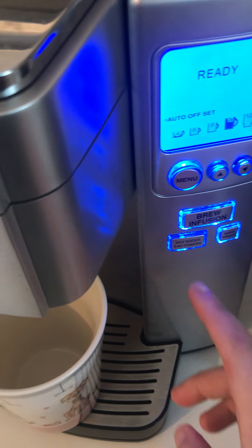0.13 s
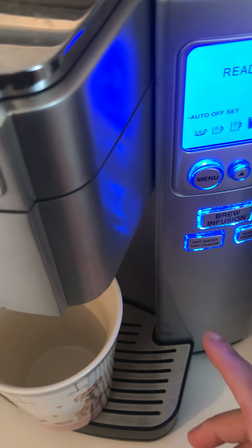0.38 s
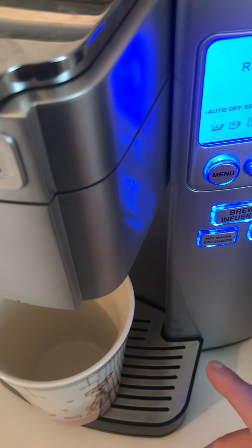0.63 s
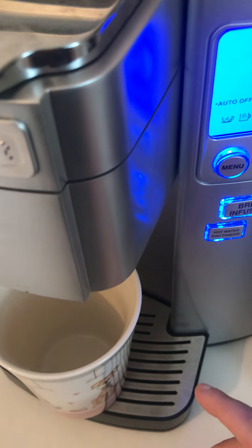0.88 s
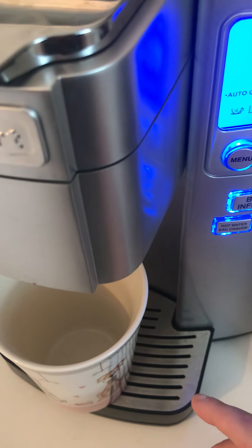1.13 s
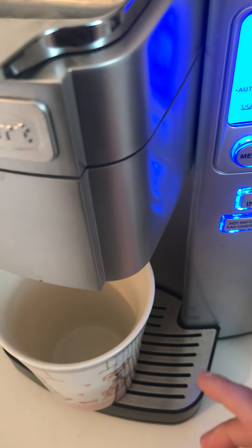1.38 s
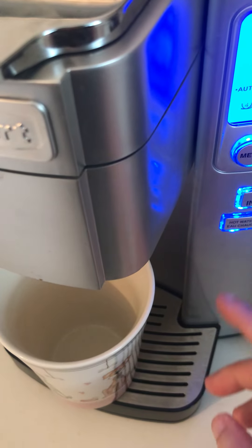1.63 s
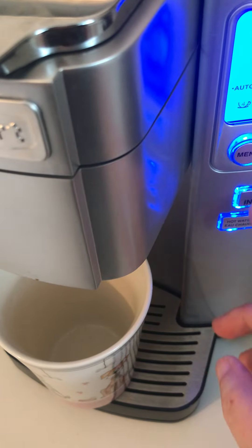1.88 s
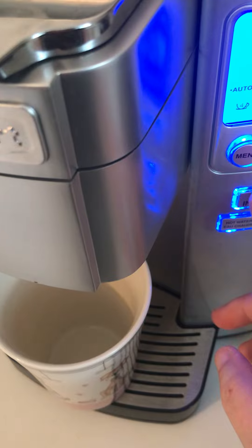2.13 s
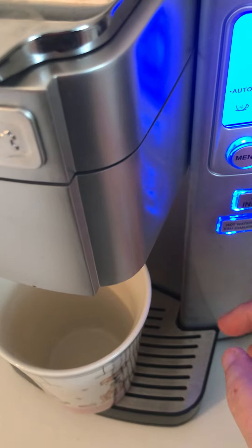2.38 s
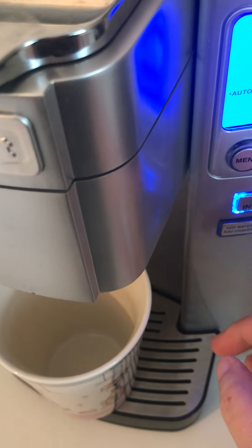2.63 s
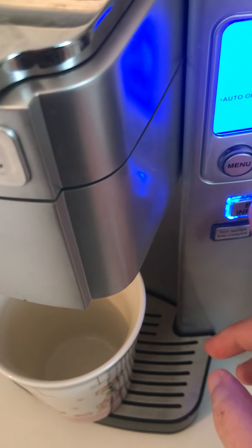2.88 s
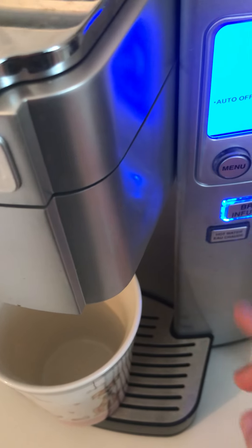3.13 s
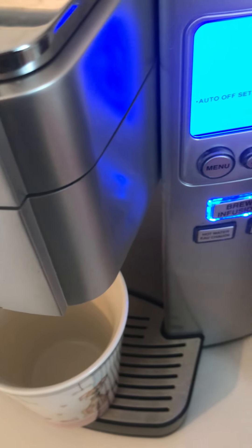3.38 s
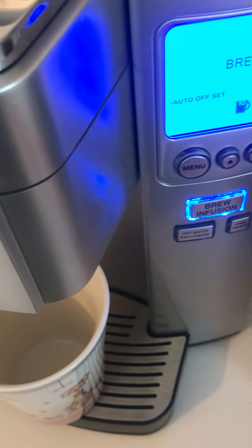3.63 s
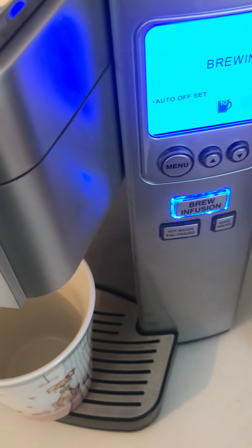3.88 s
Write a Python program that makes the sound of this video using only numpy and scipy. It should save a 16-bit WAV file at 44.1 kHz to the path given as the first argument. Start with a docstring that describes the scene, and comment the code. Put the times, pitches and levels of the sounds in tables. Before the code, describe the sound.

After over two seconds of quiet room tone and faint regular ticking, a switch snaps, and a coffee maker's vibrating pump buzzes low to the end with small water ticks, close phone microphone, little echo.

```python
"""Coffee machine starting its pump

A quiet kitchen, one phone microphone, the machine heard with only a little of the room around it. Its switch
clicks in and out as ringing plastic; then a mains-driven vibration pump starts: stroke harmonics hum, the piston
knocks on its stop and a valve snaps once a stroke, and shaped noise hisses as pressure builds. A low tone glides
up at the start and water ticks in the tubing. A fridge-like motor farther off drones just under mains pitch and
beats with the pump; a faint, high tick repeats steadily over the room tone.
"""
import sys
import numpy as np
from scipy import signal
from scipy.fft import rfft, irfft
from scipy.io import wavfile
from scipy.ndimage import uniform_filter1d, map_coordinates

SR = 44100
rng = np.random.default_rng(int(sys.argv[2]) if len(sys.argv) > 2 else 0)


def master_out(mix):
    """Clip the mix to full scale and print it as 16-bit PCM to the path in sys.argv[1]."""
    frames = np.transpose(np.atleast_2d(mix))
    ceiling = np.clip(frames, -1, 1)
    pcm = np.round(ceiling * 32767).astype(np.int16)
    wavfile.write(sys.argv[1], SR, pcm)


def natural_amplitude(level_db):
    """Convert a level in decibels to a linear amplitude factor, elementwise."""
    exponent = np.asarray(level_db, float) / 20
    return 10 ** exponent


N = 176400
T = np.arange(N) / SR

MAINS_HZ = 60
STROKE_S = 0.0118  # the piston lands this far into a mains cycle
TURN = 2 * np.pi * MAINS_HZ * (T - STROKE_S)  # phase of the stroke in radians
VALVE_LAG_S = 0.0052  # the valve snaps this long after the piston


def unit(x):
    """Scale to rms 1."""
    return x / np.sqrt(np.mean(x ** 2) + 1e-20)


def along(points, hz):
    """Read a curve of (Hz, value) points on a log frequency axis."""
    f, v = np.transpose(points)
    return np.interp(np.log(hz + 1), np.log(f + 1), v)


def wobble(rate):
    """A smooth random curve through rate knots a second."""
    return map_coordinates(rng.standard_normal(int(N * rate / SR) + 4), [T * rate])


def rush(spectrum, patchy_db, low_hz=0):
    """Coloured noise of rms 1, with time-frequency patches of random gain (patchy_db rms)."""
    z = signal.stft(rng.standard_normal(N + 512), nperseg=512)[2]
    field = uniform_filter1d(rng.standard_normal(z.shape), size=5, axis=0)
    field = uniform_filter1d(field, size=8, axis=1)
    patchy = signal.istft(z * natural_amplitude(patchy_db * unit(field)), nperseg=512)[1][:N]
    hz = np.fft.rfftfreq(N, 1 / SR)
    colour = natural_amplitude(along(spectrum, hz)) * (hz > low_hz)
    return unit(irfft(rfft(patchy) * colour, N))


def strike(hits, modes, crack_db, crack_s, scatter_db=3, spread=.012, attack_s=0.00022, count=1):
    """Each hit (s, dB, tilt) rings count decaying, detuned partials around every mode, with a crack of noise."""
    out, t = np.zeros(N + SR), np.arange(SR // 10) / SR
    hz, level, t60 = np.repeat(np.transpose(modes), count, axis=1)[:, :, None]
    place = np.tile(np.linspace(-1, 1, count + 2)[1:-1], len(modes))[:, None]
    for s, db, tilt in hits:
        level_draw, pitch_draw, phase = rng.standard_normal((3, len(hz), 1))
        detuned_hz = hz * (1 + spread * (place + 0.227 * pitch_draw))
        envelope = natural_amplitude(level + tilt * np.log2(hz / 1500) + scatter_db * level_draw - 60 * t / t60)
        partials = envelope * np.sin(2 * np.pi * (detuned_hz * t + phase))
        ring = partials.sum(axis=0) / np.sqrt(count) * (1 - np.exp(-t / attack_s))
        crack = natural_amplitude(crack_db + 2 * tilt - 60 * t / crack_s) * rng.standard_normal(len(t))
        out[round(s * SR):][:len(t)] += natural_amplitude(db - 5.5) * (ring + crack)
    return out[:N]


# Colour of the quiet kitchen. Each row: frequency in Hz, relative level in dB.
ROOM_COLOUR = [(70, -17.5), (86, -11.5), (108, -20), (141, -22), (175, -16), (212, -19.5), (285, -16.5),
               (439, -24), (754, -31), (988, -29.5), (2160, -45.5), (3600, -45.5), (4500, -49.5),
               (4900, -52), (5600, -48), (8000, -53), (9500, -52.5), (10400, -56.5), (11500, -53.5),
               (15500, -51)]


def room_tone():
    """Patchy broadband noise over a separate low rumble peaking near 45 Hz."""
    rumble = rush([(20, -28), (45, 2), (68, -3), (75, -102)], 1.1)
    return natural_amplitude(-59.4) * rush(ROOM_COLOUR, 1.53, low_hz=69.3) + natural_amplitude(-77.5) * rumble


# Faint tones in the room. Each row: centre pitch in Hz, mean level in dB rms, scale of the pitch wander in Hz.
FAINT_TONES = [(121.4, -71.5, .3), (176.5, -71, 7.97), (248, -67.5, 5.73), (285.7, -69, 6.22),
               (352.6, -74, 6.29), (613, -82, 3), (1001, -79, 1.8), (1239, -86, 1.95), (3214, -92.5, 1.5),
               (3315, -95, 1.3)]


def faint_tones():
    """Quiet sines whose pitch and level wander at random."""
    tones = 0
    for hz, db, wander_hz in FAINT_TONES:
        cycles = hz * T + np.cumsum(wander_hz * wobble(12)) / SR
        tones += np.sqrt(2) * natural_amplitude(db + 2.9 * wobble(5.905)) * np.sin(2 * np.pi * cycles)
    return tones


def far_motor():
    """A sine just under mains pitch, so it drifts in and out of step with the pump's hum."""
    drone_hz, in_step_s = 59.2, 3.49  # pitch; moment when it swings with the pump
    cycles = drone_hz * (T - in_step_s) + MAINS_HZ * (in_step_s - STROKE_S)
    return -np.sqrt(2) * natural_amplitude(-52.5 + 0.24 * wobble(2.3)) * np.cos(2 * np.pi * cycles)


def ticking():
    """A regular faint high tick of three short partials, with weaker strays at random moments."""
    start_s, period_s, tick_hz, t60_s = 0.0942, 0.10243, 14300, 0.0073
    beat = np.arange(start_s, N / SR, period_s)
    stray = rng.uniform(0, N / SR, size=40)
    hits = [(s, -59, 0) for s in beat] + [(s, -66, 0) for s in stray]
    modes = [(tick_hz * ratio, -4, t60_s) for ratio in (.9, 1, 1.07)]
    return strike(hits, modes, -6, 0.007, scatter_db=2.0)


# Decay of the kitchen. Each row: frequency in Hz, time to fall by 60 dB in seconds.
KITCHEN_DECAY = [(200, 0.56), (2000, 0.3), (12000, 0.33)]


def kitchen(x):
    """Reverberation by a noise tail in which each frequency dies at its own speed."""
    hz, t, z = signal.stft(rng.standard_normal(SR // 2), SR, nperseg=256)
    decay = natural_amplitude(-60 * t / along(KITCHEN_DECAY, hz)[:, None])
    tail = signal.istft(z * decay, SR, nperseg=256)[1]
    delayed = np.pad(x, (200, 0))  # samples before the room answers
    return signal.fftconvolve(delayed, tail / np.linalg.norm(tail))[:N]


# Water ticks in the tubing. Each row: time in seconds, nominal peak in dB, pitch in Hz.
WATER_TICKS = [(2.8744, -43.5, 2210), (2.9297, -45.5, 4020), (3.2574, -54, 2360), (3.3233, -47.5, 2390),
               (3.5174, -47, 2360), (3.5738, -50.5, 2720)]


def droplets():
    """Short ticks of one colour each; weaker ones fall at random while the pump runs."""
    pump_on_s = PUMP_DRIVE[1][0]
    u = rng.uniform(size=(45, 3))
    stray_s = pump_on_s + (N / SR - pump_on_s) * u[:, 0]
    stray_db = -54.5 - 8 * u[:, 1]
    stray_hz = 3640 * 2.1 ** (u[:, 2] - .5)
    ticks = 0
    for s, db, hz in [*WATER_TICKS, *np.transpose([stray_s, stray_db, stray_hz])]:
        mode = [(hz, 0, 0.016)]  # dies by 60 dB in 16 ms
        ticks += strike([(s + .0008, db + 6.5, 0)], mode, -9, 0.011, scatter_db=0.0, spread=.16, count=4)
    return ticks


# Switch contacts. Each row: start in seconds, nominal peak in dB, treble tilt in dB per octave.
SWITCH_CLICKS = [(2.4215, -55.5, -4), (2.4545, -42, 3.5), (2.5275, -32.5, -1), (2.5370, -41, 3.5),
                 (2.578, -59, 6)]
# Plastic of the button. Each row: frequency in Hz, relative level in dB, time to fall by 60 dB in seconds.
BUTTON_MODES = [(154.5, -11.5, 0.16), (271, -10.5, 0.135), (432, -8, 0.13), (698, -4, 0.09),
                (1022, -2.5, 0.085), (1356, -2.5, 0.076), (1772, -1.5, 0.035), (2237, -0.5, 0.04),
                (2770, -5, 0.032), (3500, -10, 0.046), (5030, -11.5, 0.027), (7000, -14, 0.026),
                (10000, -24, 0.023), (14500, -20, .02)]


def switch():
    """Contacts snap and ring the button's plastic in dense clusters of partials."""
    return strike(SWITCH_CLICKS, BUTTON_MODES, -9, 0.025, scatter_db=4.0, spread=0.165, attack_s=0.00021,
                  count=12)


# Machine housing. Each row: frequency in Hz, relative level in dB, time to fall by 60 dB in seconds.
HOUSING_MODES = [(247, -4.5, 0.076), (445, -0.5, 0.06), (684, 1, 0.055), (903, -5.5, 0.066),
                 (1274, -6, 0.046), (2480, -18.5, 0.046), (6070, -19, .012)]


def housing_jolt():
    """The housing jolts once and rings its lower, softer modes."""
    return strike([(2.8035, -29, 0)], HOUSING_MODES, -28, 0.024, scatter_db=0.0, spread=0.12,
                  attack_s=0.0022, count=4)


# Start-up tone. Each row: time in seconds, pitch in Hz, level in dB rms.
STARTUP_GLIDE = [(2.62, 72, -70), (2.66, 88, -53), (2.7, 107, -54), (2.75, 128, -62), (2.8, 147, -59),
                 (2.84, 150.4, -52), (2.92, 152, -68), (3.0, 153, -90)]


def glide():
    """A low sine glides up as the pump starts; its phase sums the moving pitch."""
    s, hz, db = np.transpose(STARTUP_GLIDE)
    cycles = np.cumsum(np.interp(T, s, hz)) / SR
    return np.sqrt(2) * natural_amplitude(np.interp(T, s, db, left=-150)) * np.sin(2 * np.pi * cycles)


# Pump drive over time. Each row: time in seconds, fundamental in dB rms, gain of low overtones in dB, gain of
# high overtones in dB, body noise in dB, shudder in dB, hiss in dB.
PUMP_DRIVE = [(2.595, -77, -30, -30, -82, -70, -64), (2.609, -50, -3, -16, -55.5, -58, -56.5),
              (2.64, -47, -10, -13, -54.5, -55, -64), (2.69, -39.5, 0, -5, -56.5, -58, -67),
              (2.74, -44, -5.5, -1.5, -55, -50, -68), (2.8, -43, 0.5, -2, -57.5, -56.5, -66.5),
              (2.9, -42, -0.5, -3, -55.5, -56.5, -66), (3.05, -44, -1.5, 0, -59.5, -61, -66.5),
              (3.2, -43, 0.5, -0.5, -57, -65, -66), (3.35, -42, -2.5, 1, -53, -63, -64.5),
              (3.55, -42.5, -1, 0, -53, -62, -65), (3.75, -45, -1, -0.5, -57, -58, -61.5),
              (3.88, -44.5, -2.5, 0.5, -54.5, -58, -60), (4.0, -42.5, -1.5, 1.5, -57, -71, -59.5)]


def pump_drive():
    """Amplitude curves of the pump's six parts, silent before it starts."""
    s, *columns = np.transpose(PUMP_DRIVE)
    return [natural_amplitude(np.interp(T, s, column, left=-150)) for column in columns]


# Overtones of the stroke. Each row: multiple of mains pitch, level in dB rms before the drive gain.
STROKE_OVERTONES = [(2, -50), (3, -62), (4, -66), (5, -59), (6, -58.5), (7, -67), (9, -69.5), (10, -62),
                    (11, -66), (12, -64), (13, -69.5), (18, -68), (21, -80)]


def pump_hum(low, over, high):
    """Harmonics locked to the stroke; those above the second waver in level and drift in phase."""
    (_, second_db), *rest = STROKE_OVERTONES
    tones = over * natural_amplitude(second_db + 0.5 * wobble(6.2)) * np.cos(2 * TURN - .6)
    for k, db in rest:
        gain = (over if k < 9 else high) * natural_amplitude(db + 2.6 * wobble(9))
        drift = .09 * wobble(7) + .12 * rng.standard_normal()  # slow drift and fixed scatter
        tones += gain * np.cos(k * (TURN + drift))
    return -np.sqrt(2) * (low * np.cos(TURN) + tones)


# Colour of the body noise. Each row: frequency in Hz, relative level in dB.
BODY_COLOUR = [(47, -47), (80, -13), (203, -16.5), (355, -16.5), (500, -16.5), (717, -14.5), (831, -18.5),
               (1100, -19), (1630, -29), (1850, -30.5), (4000, -40.5), (5200, -87), (8800, -120)]
# Colour of the pressure hiss. Each row: frequency in Hz, relative level in dB.
HISS_COLOUR = [(1760, -7), (3000, -2), (3430, -7.5), (4540, -5.5), (4930, -7.5), (7050, -4), (8340, -4),
               (10600, -7.5), (12600, -6), (15100, -12), (16000, -17)]
# Colour of the low shudder. Each row: frequency in Hz, relative level in dB.
SHUDDER_COLOUR = [(70, -38), (100, -6), (150, 4.5), (185, 1.5), (220, -16), (300, -76)]


def pump_noise(body, shudder, hiss):
    """Body noise swells with the piston, hiss with the later valve; the shudder does not pulse."""
    late = TURN - 2 * np.pi * MAINS_HZ * VALVE_LAG_S
    body_noise = body * (1 + 0.28 * np.cos(TURN)) * rush(BODY_COLOUR, 2.23)
    hiss_noise = hiss * (1 + 0.15 * np.cos(late)) * rush(HISS_COLOUR, 1.45)
    return body_noise + hiss_noise + shudder * rush(SHUDDER_COLOUR, 0.83)


# Casing rung by the piston. Each row: frequency in Hz, relative level in dB, time to fall by 60 dB in seconds.
CASING_MODES = [(1270, -21, 0.026), (1642, -0.5, 0.031), (2360, -6.5, 0.029), (2600, -9, 0.026),
                (4070, -14, 0.018)]
# Ring of the valve. Each row: frequency in Hz, relative level in dB, time to fall by 60 dB in seconds.
VALVE_MODES = [(6060, -17, .03), (7170, 2.5, 0.028), (8500, -0.5, .03), (9520, -5, 0.038),
               (11200, -3, 0.028)]
# Harder landings. Each row: time in seconds, nominal peak in dB, treble tilt in dB per octave.
HARD_LANDINGS = [(2.6055, -45, -1), (2.616, -47, 2), (2.7242, -51, -3), (2.8599, -48, -8),
                 (3.0956, -51, -7), (3.1935, -53, 7), (3.2112, -51, 2), (3.2616, -45.5, 1),
                 (3.2779, -38.5, 0), (3.2936, -52, -2), (3.324, -52, -2), (3.3737, -49, -4),
                 (3.388, -45.5, 2), (3.444, -44.5, -6), (3.4615, -47, -8), (3.4891, -48.5, -5),
                 (3.5096, -44, -1), (3.5262, -46.5, 0), (3.5563, -51, -5), (3.6273, -49, -2),
                 (3.6446, -45, -6), (3.66, -53, -5), (3.6754, -47, 2), (3.692, -50, -2), (3.7612, -49, -5),
                 (3.7778, -49.5, -3), (3.808, -49, 0), (3.8237, -53, 3), (3.9125, -50, -8),
                 (3.9418, -48.5, 2)]


def pump_knocks():
    """Every stroke the piston knocks the casing and the valve snaps; some landings are harder."""
    first = np.ceil(PUMP_DRIVE[0][0] * MAINS_HZ)
    # each knock starts 3 ms early, to allow for its soft attack
    strokes = np.arange(first, N / SR * MAINS_HZ) / MAINS_HZ + STROKE_S - .003
    knock_draw, snap_draw, time_draw = rng.standard_normal((3, len(strokes)))
    flat = np.zeros(len(strokes))  # no treble tilt
    knocks = np.transpose([strokes + .0006 * time_draw, -49 + 2.5 * knock_draw, flat])
    snaps = np.transpose([strokes + VALVE_LAG_S, -58 + 0.5 * snap_draw, flat])
    landings = [(s - .0012, db + 12, tilt) for s, db, tilt in HARD_LANDINGS]
    soft = strike(knocks, CASING_MODES, -13, .015, spread=0.058, attack_s=0.0036)
    snap = strike(snaps, VALVE_MODES, -12, .02, attack_s=0.0013)
    hard = strike(landings, CASING_MODES, -23, 0.018, scatter_db=1.6, spread=.04, attack_s=0.0046)
    return soft + snap + hard


def scene():
    """All sources; switch, housing and water ring in the kitchen, the knocks more faintly."""
    background = room_tone() + faint_tones() + far_motor() + ticking()
    low, over, high, body, shudder, hiss = pump_drive()
    steady = pump_hum(low, over, high) + pump_noise(body, shudder, hiss) + glide()
    knocks = pump_knocks()
    hits = switch() + housing_jolt() + droplets()
    wet = kitchen(natural_amplitude(-10.5) * hits + natural_amplitude(-20) * knocks)
    return (background + steady + knocks + hits + wet)[None]


def top_cut(x):
    """Nothing passes above the cut-off."""
    return signal.sosfilt(signal.butter(12, 16390, fs=SR, output="sos"), x)


def record(dry):
    """The finished mix as the phone stores it."""
    return top_cut(dry)


dry = scene()
out = record(dry)
master_out(out)
```